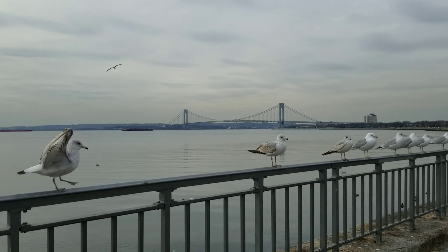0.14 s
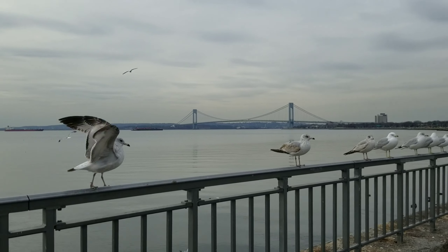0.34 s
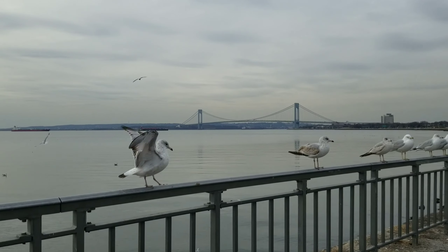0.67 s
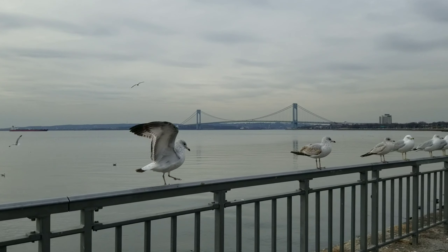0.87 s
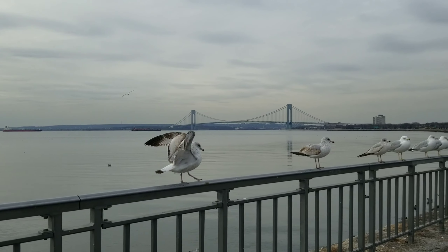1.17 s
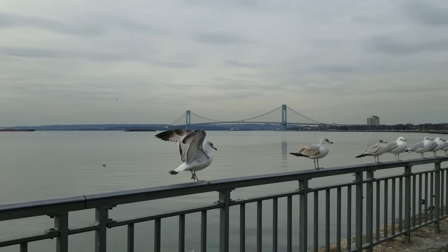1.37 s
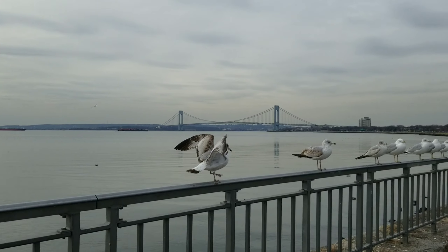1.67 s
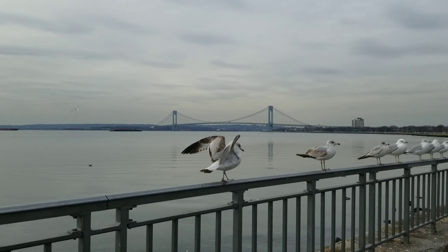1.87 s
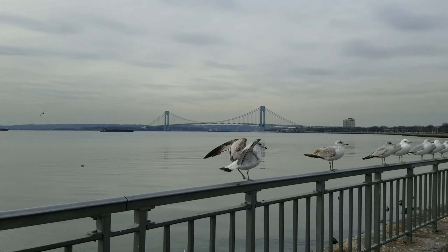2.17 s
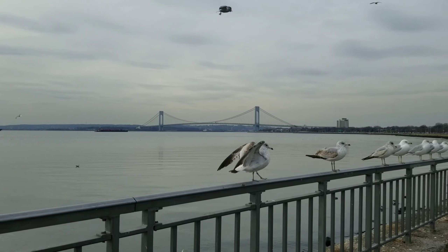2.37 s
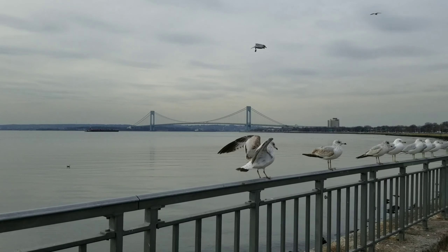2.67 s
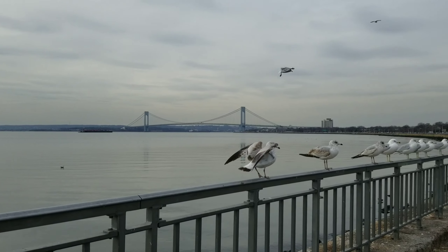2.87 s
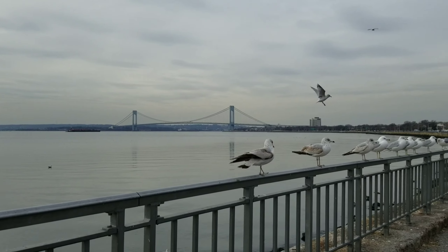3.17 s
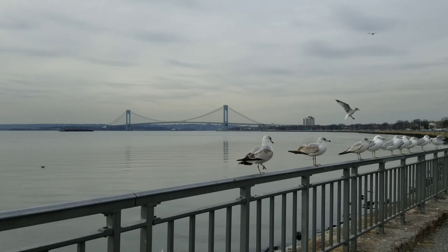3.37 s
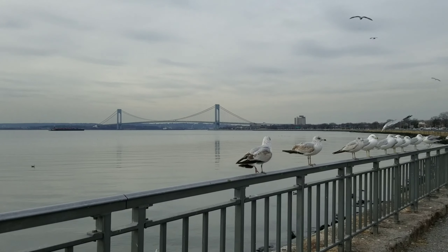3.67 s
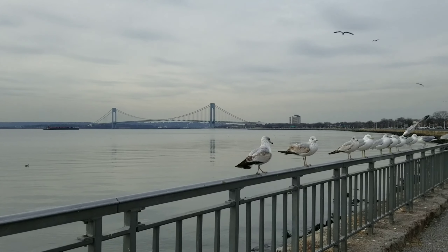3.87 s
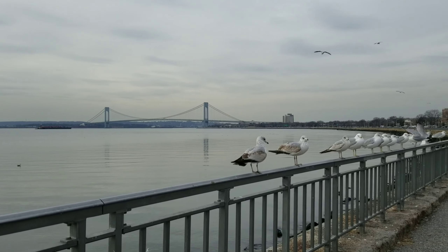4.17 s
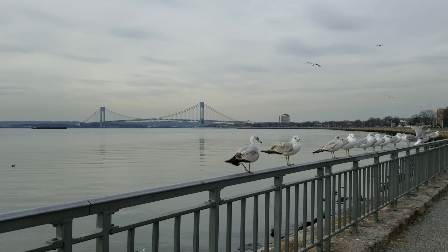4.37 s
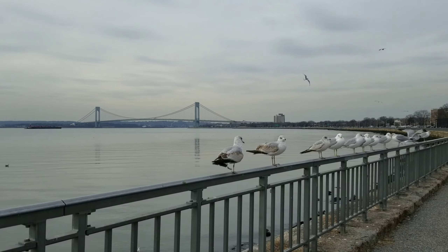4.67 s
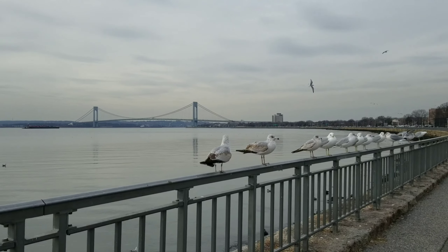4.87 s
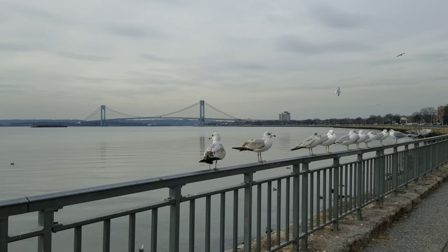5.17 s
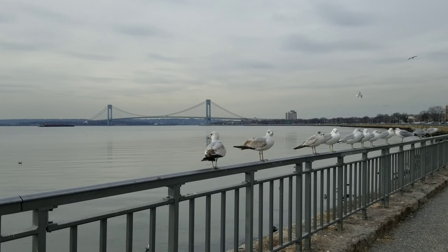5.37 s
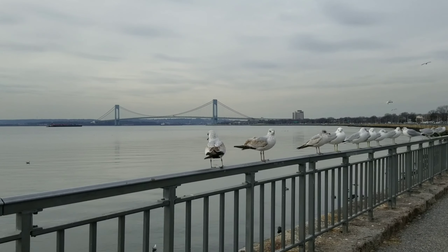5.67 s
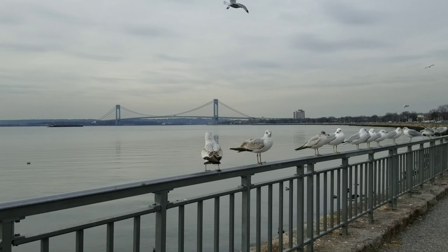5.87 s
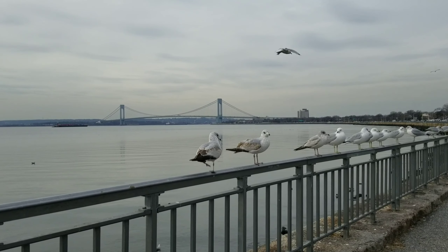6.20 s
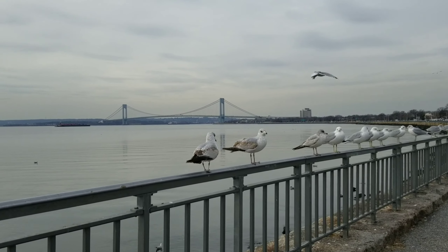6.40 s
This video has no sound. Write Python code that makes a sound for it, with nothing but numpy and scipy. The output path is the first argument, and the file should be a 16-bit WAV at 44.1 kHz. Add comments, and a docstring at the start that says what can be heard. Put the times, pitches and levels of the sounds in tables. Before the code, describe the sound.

Raspy gull cries open, one loud wavering squeal bursts from the left, then faint far calls drift over deep wind and city rumble.

```python
"""Young gulls squeal and rasp on a harbour railing, over steady rumble of far city and wind and a faint rustle.
Each whistle sums harmonics with flutter side tones; each rasp sums the flutter's own uneven harmonics.
Soft swishes and ticks of bright noise pass by; from 1.7 s thin gliding gull calls answer along the shore.
At 2.3 s a gull on the left gives the loudest squeal, ending in a wavering glide; far calls go on after it.
At 6.2 s a low, rough distant tone joins them; a decaying noise tail echoes far sounds more than near ones."""
import sys
import numpy as np
from scipy import signal
from scipy.fft import rfft, irfft
from scipy.io import wavfile
from scipy.ndimage import uniform_filter1d, map_coordinates

SR = 44100
rng = np.random.default_rng(int(sys.argv[2]) if len(sys.argv) > 2 else 0)


def dump_mix(stems):
    """Bounce the given channels to the path in sys.argv[1] as a 16-bit WAV at rate SR."""
    frames = np.atleast_2d(stems).T  # one column per channel
    limited = np.clip(frames, -1, 1)  # hard clip at full scale
    pcm = np.round(limited * 32767).astype(np.int16)
    wavfile.write(sys.argv[1], SR, pcm)


N = 288414
TIME = np.arange(N) / SR
BINS = np.maximum(np.arange(N // 2 + 1) * SR / N, 1)   # Hz
CUTOFF_HZ = 15500

# voice registers, named by the whistle table: harmonics_1_to_6_db, mean_flutter_hz, side_tone_db
SHRILL = ((-10.5, -24, -0.5, -28, -18, -20), 1200, -11.5)
THIN = ((-13, 0.5, -33, -38, -41, -39), 780, -35)
REEDY = ((-7.5, 0, -22, -.5, -40, -10), 560, -11)
LOW = ((0.5, -19.5, -38, -30, -33, -35), 170, -15)
BRIGHT = ((-40, -1.5, -45, -8, -46, -26), 780, -16)
CRACKED = ((-21, 1, -17, -2.5, -20, -21.5), 110, -15.5)
# near gulls' places: left_over_right_db, left_lag_ms
ON_RAIL, AT_LEFT, FAR_LEFT = (-2.3, 0.4655), (5.9, -0.4515), (7, -0.33)


def from_db(db):
    """Decibels to amplitude gain."""
    return 10 ** (np.asarray(db) / 20)


def rms_one(x):
    """Scale to unit power."""
    return x / np.sqrt(np.mean(x ** 2) + 1e-20)


def at_hz(points):
    """Interpolate (Hz, value) points over log frequency at every bin."""
    hz, value = np.transpose(points)
    return np.interp(np.log(BINS), np.log(np.maximum(hz, 1)), value)


def follow(rows):
    """Sample times that a curve spans, then each column at those times."""
    s, *columns = np.transpose(rows)
    t = TIME[(TIME >= s[0]) & (TIME <= s[-1])]
    return [t] + [np.interp(t, s, column) for column in columns]


def waver(t, rate_hz):
    """Smooth random curve through rate_hz normal knots a second."""
    knot_rng = np.random.default_rng(rng.integers(2 ** 31))
    knots = knot_rng.standard_normal(int((t[-1] - t[0]) * rate_hz) + 4)
    return map_coordinates(knots, [(t - t[0]) * rate_hz], order=3, mode="nearest")


def fade(t, edge_s):
    """Sine-squared onset and end."""
    to_edge_s = np.minimum(t - t[0], t[-1] - t)
    return np.sin(np.pi / 2 * np.clip(to_edge_s / edge_s, 0, 1)) ** 2


def resonate(x, hz, width_hz):
    """Two-pole resonance with about unit gain at its top."""
    r = np.exp(-np.pi * width_hz / SR)
    numerator = np.array([1, 0, -1]) * (1 - r * r) / 2
    denominator = [1, -2 * r * np.cos(2 * np.pi * hz / SR), r * r]
    return signal.lfilter(numerator, denominator, x)


def place(t, x, pan_db, lag_ms):
    """A sound reaches two spaced microphones with a difference in level and time."""
    out = np.zeros((2, N))
    first = round(t[0] * SR)
    span = slice(first, first + len(t))
    shifted = map_coordinates(x, [np.arange(len(t)) - lag_ms * SR / 10 ** 3], order=3)
    out[0, span] = from_db(pan_db / 2) * shifted
    out[1, span] = from_db(-pan_db / 2) * x
    return out


def throat_db(hz):
    """How well the throat and open bill pass a partial."""
    # hz, gain_db
    throat = [(1100, -27.5), (1850, 9.5), (2450, 0.5), (3050, 12), (3700, -1.5), (4250, 1.5), (4850, 2),
              (5450, -7), (7000, -4), (8400, 0), (10700, -27), (12600, -7), (15000, -19)]
    return np.interp(hz, *np.transpose(throat))


def note(start_s, length_s, level_db, attack_s, release_s):
    """Sample times, progress 0-1 and level in dB of a note that swells, holds and fades."""
    fade_db = 16
    t = TIME[(TIME >= start_s) & (TIME < start_s + length_s)]
    rising = np.clip(1 - (t - t[0]) / attack_s, 0, 1)
    falling = np.clip(1 - (t[-1] - t) / release_s, 0, 1)
    return t, np.linspace(0, 1, len(t)), level_db - fade_db * (rising + falling)


def arch(progress, pitches_hz):
    """Parabola through a start, middle and end pitch."""
    return np.polyval(np.polyfit([0, .5, 1], pitches_hz, 2), progress)


def whistle(t, pitch_hz, level_db, register, where):
    """Harmonics of a clear tone; the flutter adds side tones, which the throat weights."""
    harmonics_db, flutter_hz, side_db = register
    uneven_hz = pitch_hz * (1 + .004 * waver(t, 700))
    phase = 2 * np.pi * np.cumsum(uneven_hz) / SR
    flutter_now_hz = flutter_hz * pitch_hz / pitch_hz.mean() * (1 + 0.024 * waver(t, 200))
    flutter_phase = 2 * np.pi * np.cumsum(flutter_now_hz) / SR
    tone = 0
    for k, harmonic_db in enumerate(harmonics_db, 1):
        for side in range(-2, 3):
            colour_db = throat_db(k * pitch_hz + side * flutter_hz) - throat_db(k * pitch_hz)
            # side tones waver more than harmonics
            shimmer_db = 2.3 * (1 + k / 2 * abs(side)) * waver(t, 65.0)
            gain = from_db(harmonic_db + abs(side) * side_db + colour_db + shimmer_db)
            tone = tone + gain * np.sin(k * phase + side * flutter_phase)
    return place(t, np.sqrt(2) * tone * from_db(level_db) * fade(t, 0.0028), *where)


def whistled_note(start_s, length_s, pitches_hz, level_db, attack_s, release_s, register, where):
    """A whistle whose pitch bows once while it swells and fades."""
    t, progress, envelope_db = note(start_s, length_s, level_db, attack_s, release_s)
    return whistle(t, arch(progress, pitches_hz), envelope_db, register, where)


def rasp(start_s, length_s, rates_hz, level_db, attack_s, release_s, bright_db, jitters, focus_hz):
    """The flutter's own harmonics, torn by uneven cycles; emphasis passes between two resonances."""
    focus_db, focus_width_hz = 15.5, 580
    t, progress, envelope_db = note(start_s, length_s, level_db, attack_s, release_s)
    rate_hz = np.interp(progress, [0, 1], rates_hz)
    jitter = np.interp(progress, [0, 1], jitters)
    phase = 2 * np.pi * np.cumsum(rate_hz * (1 + jitter * waver(t, 494))) / SR
    voice = 0
    for k in range(2, int(CUTOFF_HZ / rate_hz.mean()) + 1):
        hz = k * rate_hz
        first, last = (np.exp(-((hz - centre) / focus_width_hz) ** 2) for centre in focus_hz)
        nearness = first + progress * (last - first)
        tilt_db = bright_db * np.log2(hz / 4000)
        gain = from_db(throat_db(hz) + focus_db * nearness + tilt_db + 4.4 * waver(t, 68.6))
        # turbulence blurs each partial
        air = .42 * (waver(t, 700) + 1j * waver(t, 700))
        partial = np.exp(1j * (k * phase + rng.normal(0, 1.0)))
        voice = voice + gain * np.real((1 + air) * partial)
    voice /= np.sqrt(uniform_filter1d(voice ** 2, size=900) + 1e-12)   # even out the power
    return place(t, voice * from_db(envelope_db) * fade(t, 0.001), *ON_RAIL)


def near_gulls():
    """Whistles, the squeal's closing glide, and rasps that open and close the cries."""
    # start_s, length_s, (start, middle, end)_pitch_hz, level_db (before register), attack_s, release_s,
    # register, place
    whistle_rows = [ (0, 0.083, (2430, 2250, 2300), -47, .002, .055, SHRILL, ON_RAIL),
                    (.1, 0.22, (2300, 2210, 2130), -46.5, 0.066, 0.022, THIN, FAR_LEFT),
                    (.47, 0.061, (2000, 2100, 2060), -58.5, .012, .012, REEDY, ON_RAIL),
                    (.527, 0.23, (2070, 2160, 2030), -50.5, .01, 0.023, REEDY, ON_RAIL),
                    (1.07, .46, (2480, 2350, 2100), -58, 0.066, .05, LOW, ON_RAIL),
                    (1.785, .19, (2200, 2190, 2115), -60, 0.0083, .17, THIN, ON_RAIL),
                    (2.281, 0.044, (2365, 2460, 2480), -34, 0.021, .003, BRIGHT, AT_LEFT),
                    (2.315, 0.073, (2030, 2057, 2005), -33, .004, .028, CRACKED, AT_LEFT)]
    # wavering end of the loudest squeal: time_s, pitch_hz, level_db (before register)
    squeal_glide = [(2.374, 2418, -46), (2.384, 2414, -41.5), (2.412, 2314, -36.5), (2.44, 2280, -36.5),
                    (2.468, 2200, -44), (2.494, 2258, -40), (2.54, 2208, -48.5), (2.588, 2210, -70),
                    (2.6, 2219, -70)]
    # glide's register: harmonics_1_to_6_db, mean_flutter_hz, side_tone_db
    clear_register = ((-30, -1, -33, -13, -30, -19), 550, -26)
    # start_s, length_s, flutter_hz (start, end), level_db, attack_s, release_s, brightness_db_per_octave,
    # rate_jitter_share (start, end), emphasised_resonance_hz (start, end)
    rasp_rows = [ (0, .2, (595, 510), -46.5, 0.00087, 0.12, 2, (0.0071, 0.031), (7300, 3600)),
                 (0.386, .16, (590, 610), -47.5, 0.029, .015, 2.5, (0.046, .003), (1800, 3280)),
                 (0.731, 0.12, (590, 590), -46, 0.038, 0.064, 2, (.005, 0.043), (7000, 1970)),
                 (.972, 0.12, (628, 620), -47, 0.0089, 0.01, -0.7, (.01, 0.031), (1880, 6440)),
                 (1.081, .23, (500, 520), -51, 0.0037, 0.22, 2.5, (.004, .02), (5650, 5400)),
                 (2.323, 0.084, (970, 980), -49.5, .012, 0.015, 7, (0.017, .008), (7000, 5000))]
    whistles = sum(whistled_note(*row) for row in whistle_rows)
    glide = whistle(*follow(squeal_glide), clear_register, AT_LEFT)
    return whistles + glide + sum(rasp(*row) for row in rasp_rows)


def rumble():
    """Far city and wind noise from along the shore reaches the right microphone first."""
    # spectrum: hz, density_db
    rumble_spectrum = [(15, -37), (25, -20.5), (49, -2.5), (123, -1.5), (320, -11), (357, -12.5),
                       (545, -20.5), (711, -19), (1080, -20), (1930, -27.5), (2630, -38.5), (2940, -43),
                       (3510, -47.5), (4380, -54), (5000, -55.5), (6500, -80), (11000, -120)]
    # left-right correlation: hz, share
    likeness = [(60, 1), (170, 0.99), (330, 0.94), (600, 0.49), (1500, 0.8), (3000, 0.13), (6000, .14)]
    # hz, left_lag_ms
    shore_lag = [(120, 0.35), (400, 0.36), (800, 0.43), (2000, 0.47)]
    mid, side = rfft(rng.standard_normal((2, N)))
    alike = np.clip(at_hz(likeness), 0, .992)
    pair = np.sqrt(1 + alike) * mid + np.sqrt(1 - alike) * side * [[1], [-1]]
    pair = pair * from_db(at_hz(rumble_spectrum))
    lag_s = at_hz(shore_lag) / 10 ** 3
    pair[0] *= from_db(-0.95) * np.exp(-2j * np.pi * BINS * lag_s)
    return rms_one(irfft(pair, N)) * from_db(-37.13 + 0.58 * waver(TIME, 2.74))


def rustle():
    """A faint, slightly grainy high hiss, unrelated on the two sides."""
    # spectrum: hz, density_db
    rustle_spectrum = [(2650, -35), (4500, -14), (5170, -3), (6650, -5.5), (8550, -1), (10100, -2),
                       (13400, 2.5), (15400, -3)]
    # time_s, treble_level_db
    treble_level = [(0.0, -62), (0.2, -74), (0.46, -75), (0.62, -79), (0.82, -75), (4.75, -74), (5.41, -79),
                    (6.54, -79.5)]
    whole_over_treble_db = 5
    hiss = irfft(rfft(rng.standard_normal((2, N))) * from_db(at_hz(rustle_spectrum)), N)
    level_db = np.interp(TIME, *np.transpose(treble_level)) + whole_over_treble_db
    return rms_one(hiss) * from_db(level_db + 1.2 * waver(TIME, 45))


def scuff(centre_s, length_s, level_db, hz):
    """A short swell of bright friction noise."""
    noise = rng.standard_normal((2, N))
    for _ in range(2):
        noise = resonate(noise, hz, 0.84 * hz)
    swell = np.exp(-np.minimum((2 * (TIME - centre_s) / length_s) ** 2, 50))
    return rms_one(noise) * from_db(level_db) * swell


def scuffs():
    """Soft swishes and ticks, likely from wings and feet."""
    # centre_s, length_s, peak_level_db, centre_hz
    scuff_rows = [(.03, 0.24, -57, 12500), (1.076, 0.0073, -53, 11500), (1.105, .13, -63, 12500),
                  (3.05, 0.098, -71.5, 6270), (3.37, .04, -72, 7000), (3.635, 0.25, -72, 6650),
                  (3.843, 0.11, -72.5, 7200), (4.038, 0.067, -63, 10500), (4.25, 0.054, -66, 9000),
                  (4.66, 0.048, -68, 10100), (5.003, 0.079, -71, 7440)]
    return sum(scuff(*row) for row in scuff_rows)


def far_tone(start_s, length_s, first_hz, last_hz, level_db, jitter):
    """Distance leaves one gliding line and a trace of its octave."""
    # pitch_hz, octave_level_db
    far_octave = [(1200, -21), (2900, -4), (3600, -21)]
    t = TIME[(TIME >= start_s) & (TIME < start_s + length_s)]
    progress = (t - start_s) / length_s
    middle_hz = (first_hz + last_hz) / 2 * 1.004   # slight upward bow
    pitch_hz = arch(progress, [first_hz, middle_hz, last_hz]) * (1 + jitter * waver(t, 800))
    phase = 2 * np.pi * np.cumsum(pitch_hz) / SR
    swell = np.sqrt(2 * np.abs(np.sin(np.pi * progress))) * from_db(level_db + 3 * waver(t, 60))
    octave = from_db(np.interp(middle_hz, *np.transpose(far_octave)))
    return place(t, swell * (np.sin(phase) + octave * np.sin(2 * phase)), pan_db=-1.2, lag_ms=0.25)


def far_tones():
    """Thin gull calls from farther along the shore, and a low, rough distant tone near 1200 Hz at the end."""
    # start_s, length_s, start_hz, end_hz, level_db, pitch_jitter_share
    tone_rows = [ (1.691, 0.093, 4400, 4380, -62, 0.04), (1.972, 0.16, 4200, 4140, -74, .01),
                 (2.592, 0.17, 4280, 4090, -65, 0.0076), (2.663, .17, 4330, 4500, -64.5, .005),
                 (2.759, .2, 4080, 3940, -72.5, 0.0057), (3.061, 0.19, 4000, 4175, -64, 0.0071),
                 (4.333, .055, 3900, 4200, -73, .006), (4.425, .094, 4430, 4480, -74, .015),
                 (4.526, 0.061, 2950, 2840, -52.5, 0.014), (4.569, 0.22, 4040, 3590, -69, 0.016),
                 (4.746, 0.19, 3940, 4530, -70, 0.02), (4.748, .1, 5470, 5380, -69.5, .004),
                 (5.016, 0.12, 4020, 3800, -79, .012), (6.266, .13, 4680, 4950, -72, .008),
                 (6.24, 0.41, 1205, 1196, -56, 0.058), (6.366, 0.082, 3640, 3720, -62.5, .014),
                 (6.424, 0.17, 4620, 4180, -68.5, 0.0099)]
    return sum(far_tone(*row) for row in tone_rows)


def waterfront(x):
    """Railing, path and water scatter a thin noise tail with softened treble."""
    t60_s = .5
    t = TIME[:SR]
    tail = rng.standard_normal((2, SR)) * from_db(-60 * t / t60_s) * (t > .006)
    tail = signal.sosfilt(signal.butter(1, 7000, fs=SR, output="sos"), tail)
    tail /= np.sqrt(np.sum(tail ** 2, axis=1, keepdims=True))
    return signal.fftconvolve(x, tail, axes=1)[:, :N]


def scene():
    """Near gulls and distant tones over the harbour's noise; the distant tones carry more echo."""
    near_echo_db, far_echo_db = -21, -14
    near, far = near_gulls(), far_tones()
    echo = waterfront(from_db(near_echo_db) * near + from_db(far_echo_db) * far)
    return near + rumble() + rustle() + scuffs() + far + echo


def record(dry):
    """A steep elliptic low-pass cuts the top."""
    return signal.sosfilt(signal.ellip(12, .1, 80, CUTOFF_HZ, fs=SR, output="sos"), dry)


dry = scene()
out = record(dry)
dump_mix(out)
```